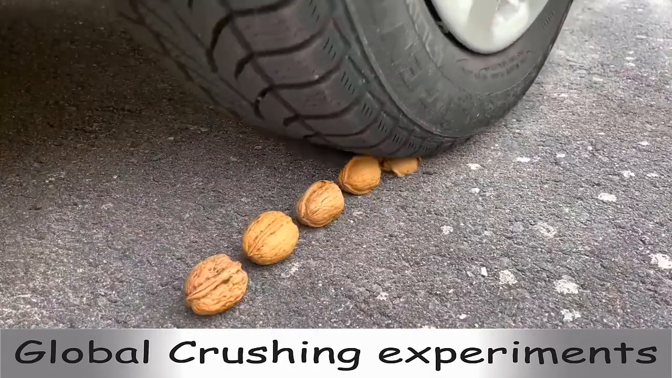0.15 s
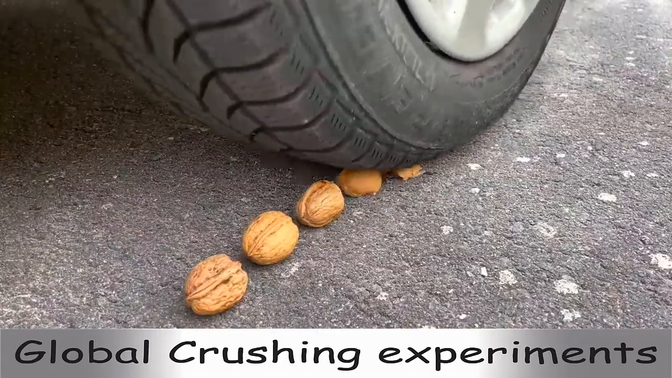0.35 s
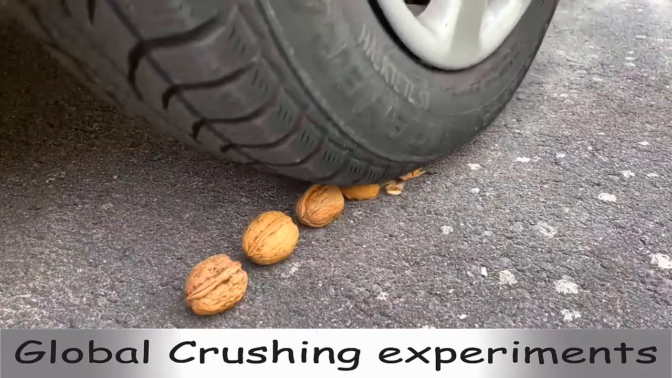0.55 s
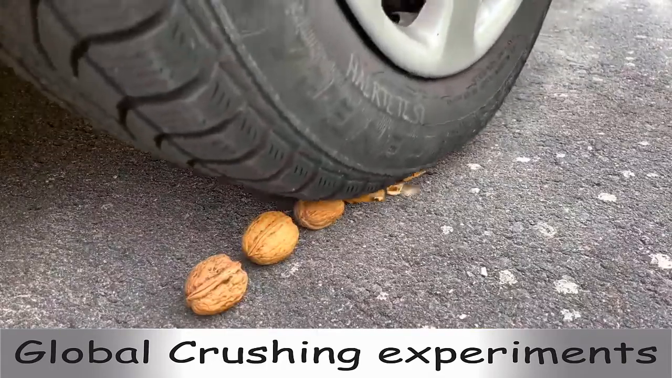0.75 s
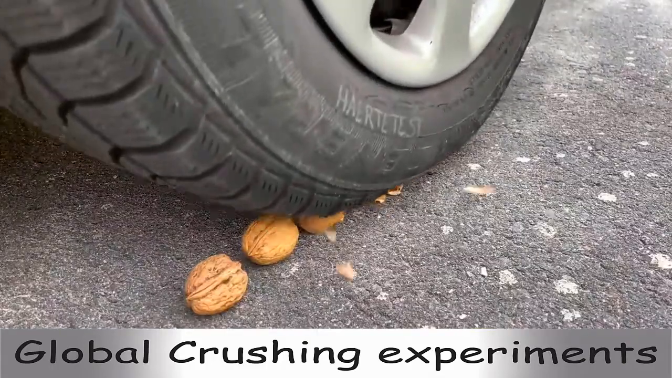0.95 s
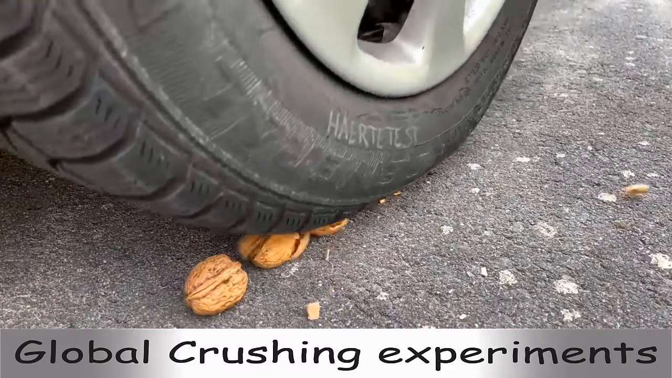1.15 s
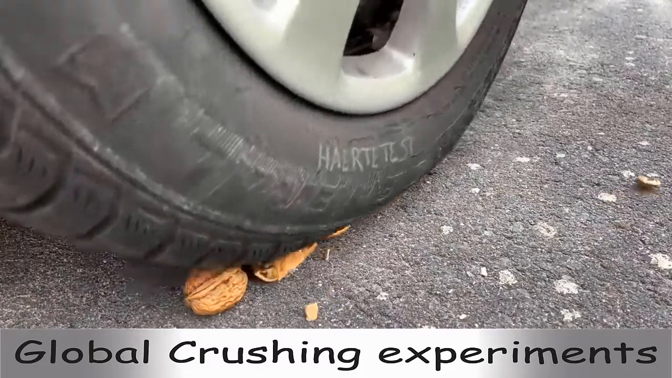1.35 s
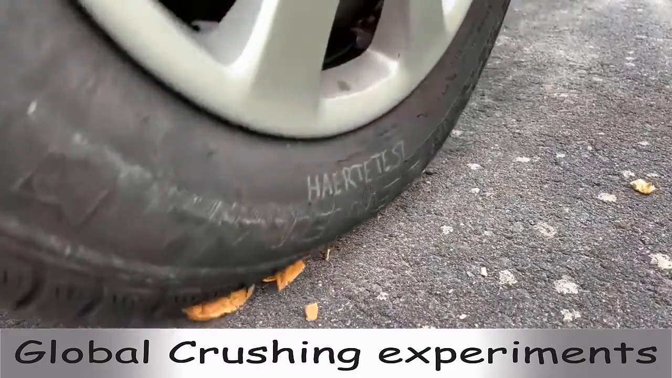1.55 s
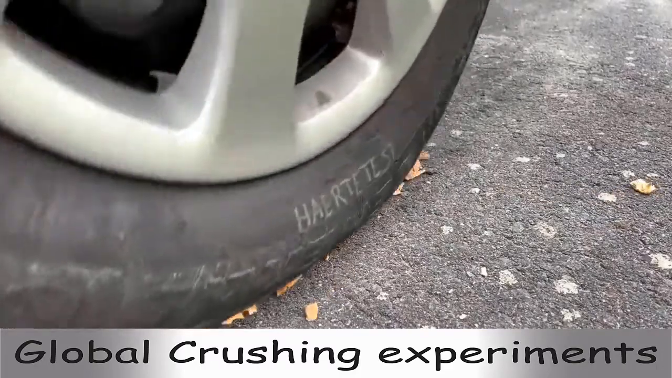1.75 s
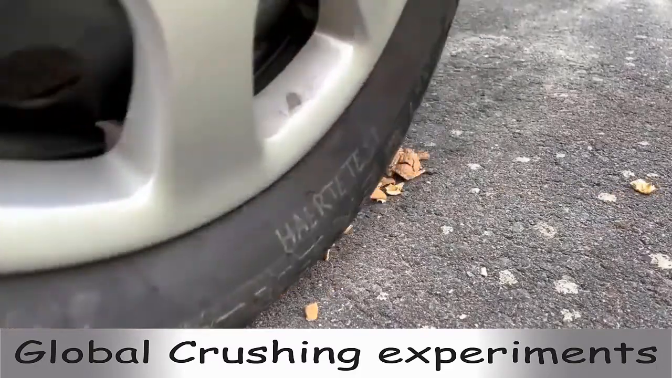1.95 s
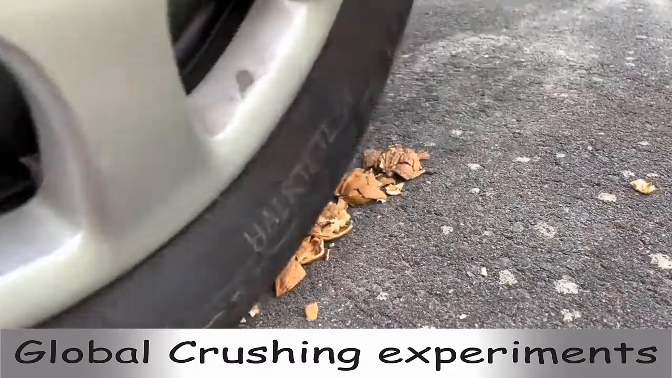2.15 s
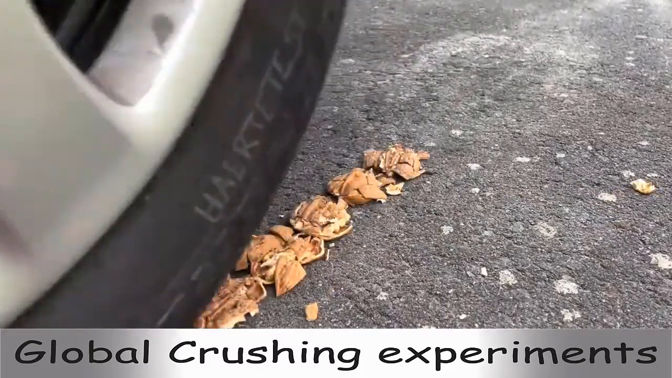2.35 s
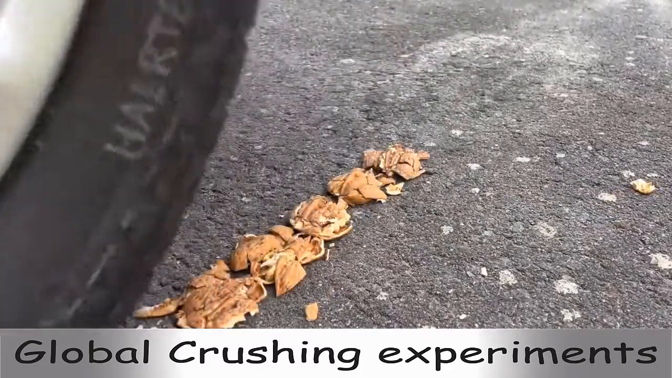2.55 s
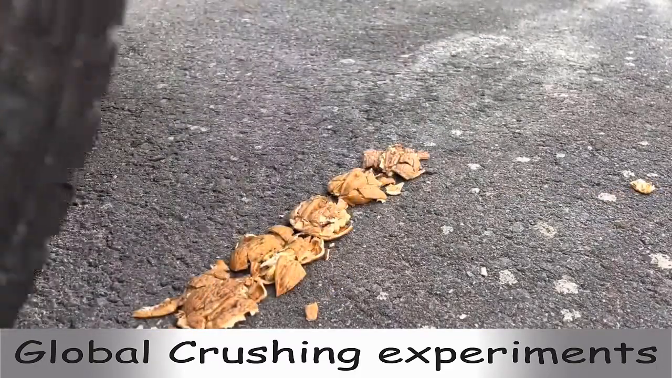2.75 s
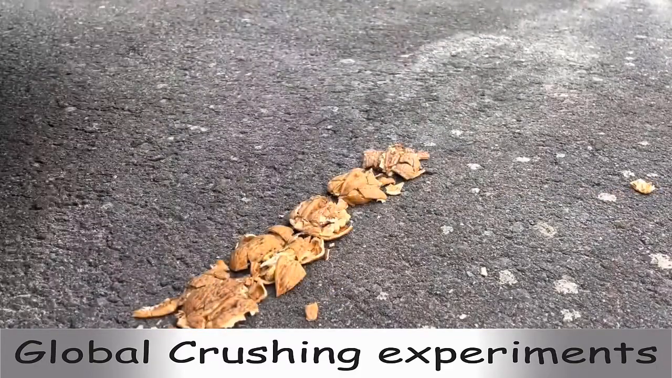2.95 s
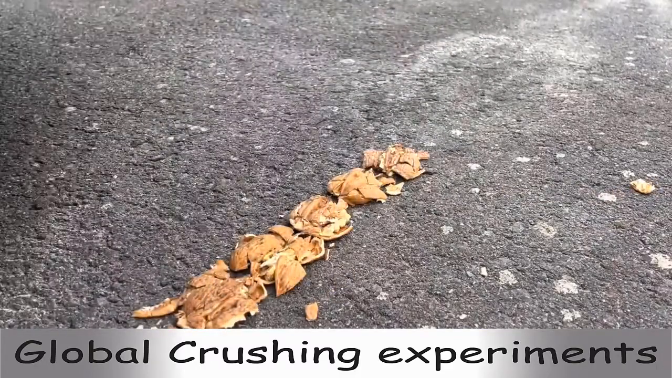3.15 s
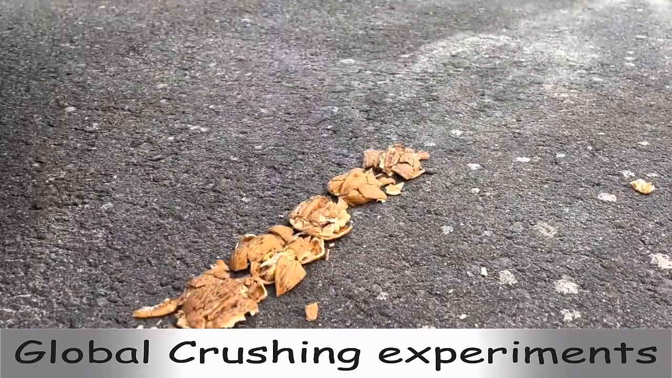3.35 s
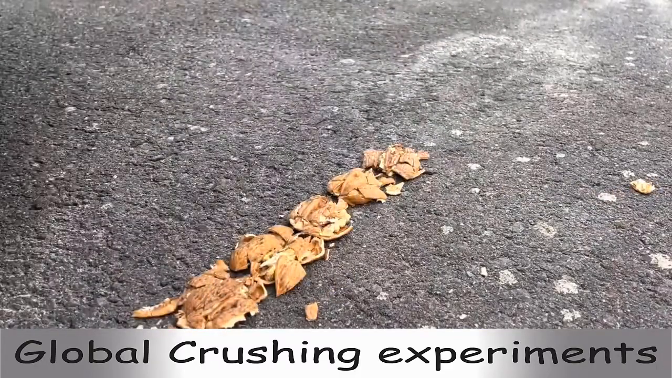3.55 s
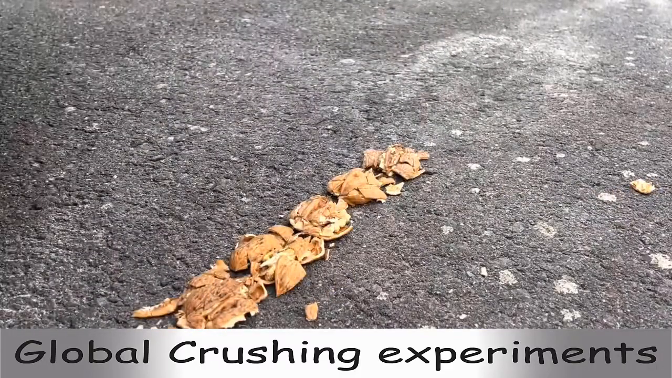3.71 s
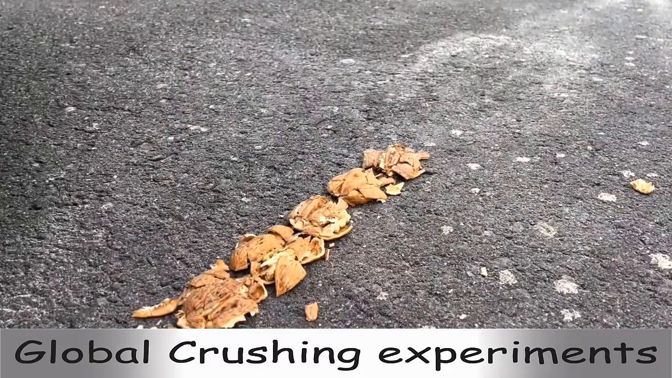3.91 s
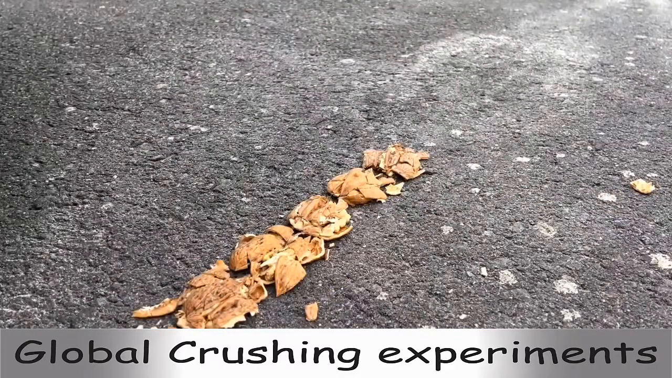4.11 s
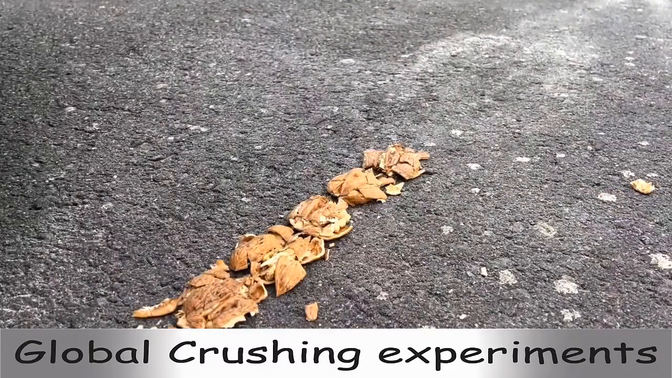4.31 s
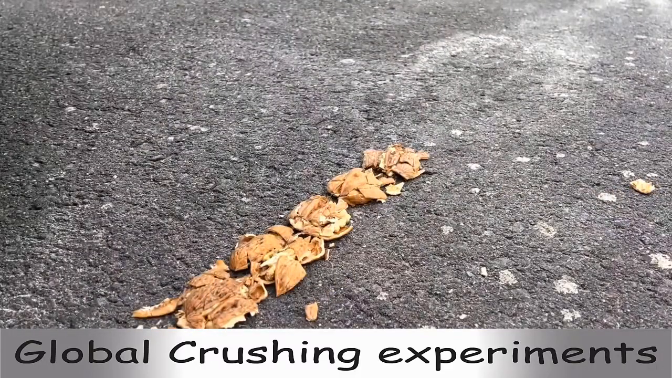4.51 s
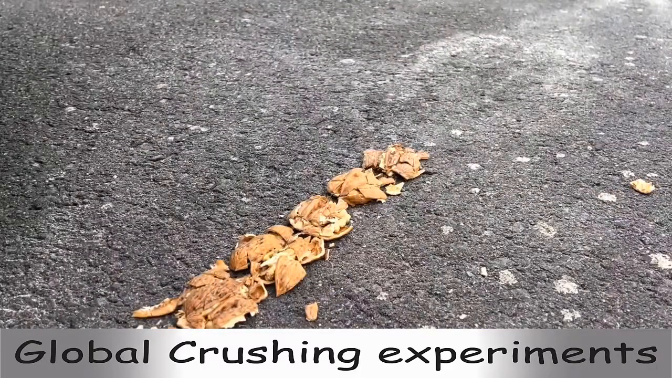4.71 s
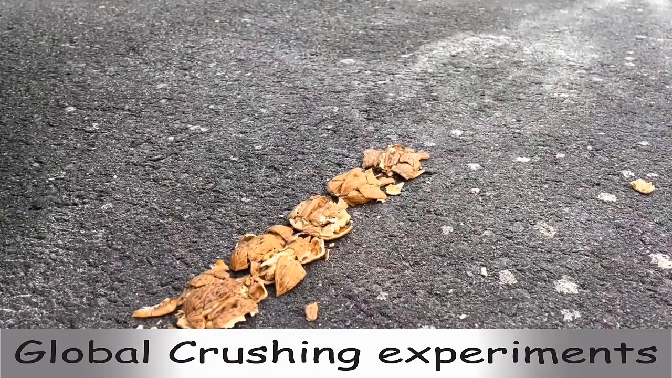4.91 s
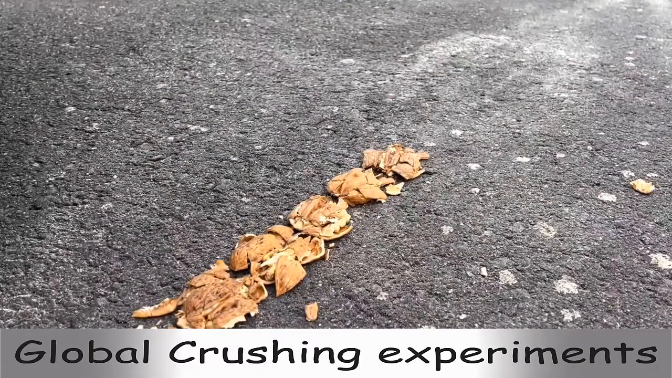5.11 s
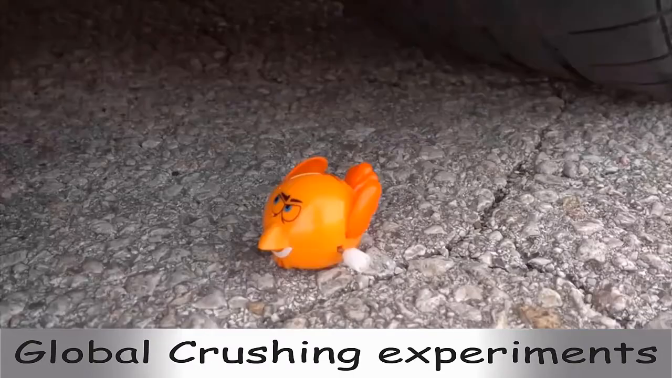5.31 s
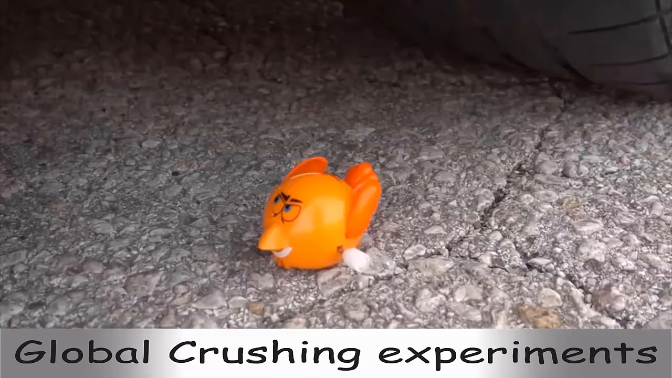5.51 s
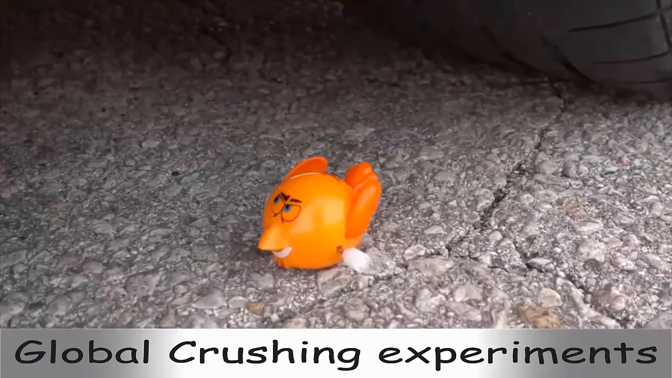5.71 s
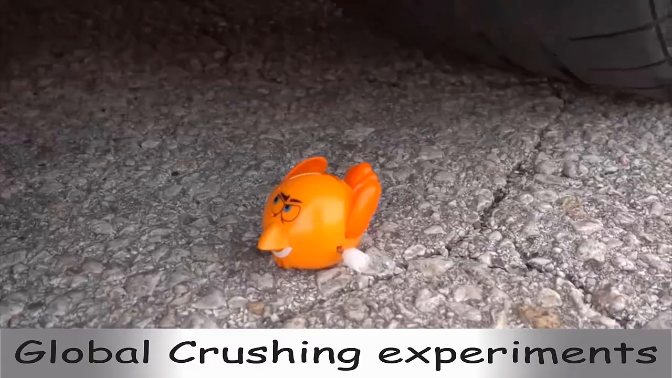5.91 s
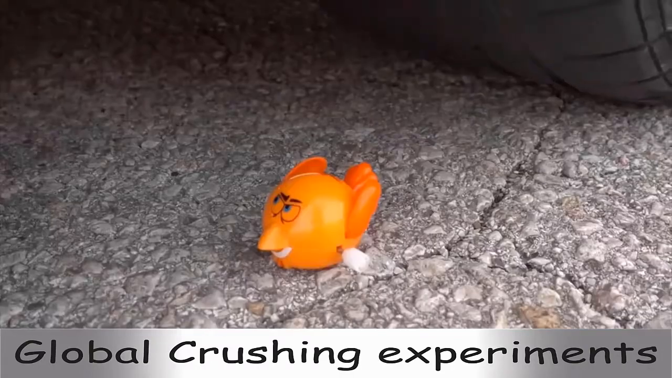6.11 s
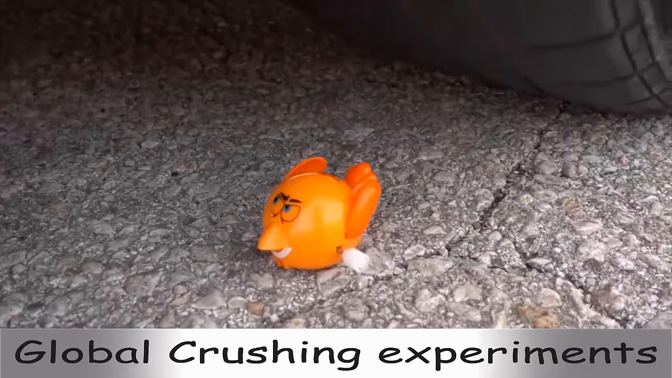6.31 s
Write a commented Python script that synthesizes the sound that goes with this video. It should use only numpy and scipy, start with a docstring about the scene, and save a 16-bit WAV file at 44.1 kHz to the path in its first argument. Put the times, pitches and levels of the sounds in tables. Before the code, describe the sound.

A car rolls slowly over a row of walnuts on asphalt, close to the microphone. The shells break in quick volleys of sharp cracks and crunches, with hollow knocks and dull thuds from the tyre. The cracking ends and the engine idles on with a low throb and a faint squeak as the car stops. Then the sound changes abruptly to gusty wind rumbling on the microphone outdoors.

```python
"""Walnuts under a tyre, then wind

An idling car rolls slowly over walnuts on asphalt, close to a stereo microphone. Each shell fails in
a volley of brittle fractures that ring between tyre and road, and the tyre drops with a thud. The car
rolls on and stops, its firings driving the resonances of the exhaust. After a short hiss the scene
changes to another spot outdoors, where turbulent wind buffets the microphone."""
import sys
import numpy as np
from scipy import signal
from scipy.fft import rfft, irfft
from scipy.io import wavfile

SR = 44100
rng = np.random.default_rng(int(sys.argv[2]) if len(sys.argv) > 2 else 0)


def wav_record(signal):
    """Record a signal, one row per channel, as 16-bit PCM in the file named by sys.argv[1]."""
    frames = np.transpose(np.atleast_2d(signal))
    bounded = np.clip(frames, -1, 1)
    # unit amplitude maps onto the largest positive 16-bit level
    quanta = np.round(bounded * 32767).astype(np.int16)
    wavfile.write(sys.argv[1], SR, quanta)


N = 284974
T = np.arange(N) / SR
SHELLS_END_S, STOP_S = 1.82, 3.6  # the tread leaves the last nut; the car stands
# Shell fractures, with levels as energies of a 1 ms burst: (time [s], snap level [dB], length [s],
# sizzle re snap [dB], shell pitch [Hz], ring level [dB], knock pitch [Hz], knock level [dB])
FRACTURES = [(0.0455, -21, 0.0036, -2.5, 2600, -23.5, 1076, -29.5),
             (0.0522, -13, 0.00079, -5, 2525, -30.5, 1084, -22.5),
             (0.0626, -17.5, 0.0024, -2.5, 1760, -20.5, 863, -15.5),
             (0.0811, -17, 0.001, -4.5, 1530, -32.5, 1147, -15.5),
             (0.0878, -19.5, 0.0027, 1, 1605, -28, 797, -19.5),
             (0.0922, -21, 0.005, -3, 2740, -37, 736, -17), (0.1234, -18, 0.00033, -1, 2564, -22, 940, -31),
             (0.1642, -26, 0.00043, 4.5, 1558, -32, 980, -27.5),
             (0.185, -28.5, 0.002, -0.5, 2600, -27, 924.5, -33),
             (0.2212, -18.5, 0.0029, 3.5, 1987, -15, 930, -12.5),
             (0.236, -21, 0.002, 1, 1720, -18.5, 1180, -26.5),
             (0.293, -29, 0.00035, 5, 2540, -22, 1020, -20),
             (0.297, -22.5, 0.0007, -5.5, 2250, -28, 917, -23),
             (0.3464, -21.5, 0.00087, -10, 1537, -28, 1151, -23.5),
             (0.3599, -23, 0.00068, -1, 2500, -26, 960, -22.5),
             (0.4008, -17.5, 0.00069, -2.5, 1860, -28, 1000, -22.5),
             (0.423, -24, 0.001, -8, 2200, -29.5, 1020, -29),
             (0.484, -23, 0.00088, -4, 2244, -33, 1098, -26.5),
             (0.553, -16, 0.00092, 1.5, 2545, -22.5, 968, -11.5),
             (0.6161, -15.0, 0.0026, 0.5, 2023, -15, 763.2, -14.5),
             (0.6233, -19.5, 0.0043, -5, 2880, -23.5, 918, -20),
             (0.6292, -15.5, 0.0043, -11, 2597, -23, 1006, -10.5),
             (0.6472, -21, 0.00092, 0.5, 2150, -16.5, 788.5, -21),
             (0.651, -17, 0.00069, -2, 2176, -15, 880, -20),
             (0.6619, -22, 0.00456, 0, 2485, -27.5, 837.2, -34),
             (0.6739, -18.5, 0.0012, -3, 2593, -15.5, 666.7, -24),
             (0.7047, -19.5, 0.0021, 3, 2190, -25, 1005, -41),
             (0.7759, -18, 0.00069, 2, 1700, -31, 917, -15.5),
             (0.7807, -16.5, 0.0023, 1.5, 2916, -28, 854, -12), (0.8, -30, 0.001, 7, 2065, -27.5, 950, -27),
             (0.8286, -38.5, 0.00075, 7.5, 2360, -35.5, 874, -28.5),
             (0.8733, -23, 0.00031, -2, 2088, -34, 1044, -19),
             (0.9995, -17.5, 0.0008, -3, 2928, -38.5, 995, -17.5),
             (1.0391, -24.5, 0.00082, 9.5, 1850, -26.5, 1067, -24.5),
             (1.0418, -14.5, 0.0027, 4, 1850, -10.5, 894, -16),
             (1.0778, -19.5, 0.00185, 1.5, 2010, -34, 790.5, -19),
             (1.2122, -14, 0.00058, -11, 1960, -28.5, 1054, -8),
             (1.3194, -41, 0.0014, 1, 1816, -39, 930, -23.5),
             (1.3852, -15, 0.0026, 1.5, 2130, -14.5, 819, -13.5),
             (1.4206, -24, 0.0025, -2, 2170, -46, 788, -32),
             (1.4488, -28, 0.0014, -1, 2000, -40.5, 1020, -26),
             (1.521, -19, 0.0016, -5, 2530, -40, 865, -15), (1.5671, -19, 0.0032, 1, 1580, -30.5, 933, -9),
             (1.5982, -27.5, 0.00062, -5, 1560, -31, 1140, -25.5),
             (1.6248, -21.0, 0.001, -11.5, 1780, -22, 1020, -11),
             (1.6348, -21, 0.0018, -0.5, 1493, -20.5, 905, -5.5),
             (1.682, -22.5, 0.00048, -1, 2447, -27.5, 1060, -21),
             (1.723, -26.5, 0.0039, -2, 2150, -31, 900, -18.5),
             (1.7374, -22.5, 0.0036, -0.5, 2080, -27, 810, -14),
             (1.778, -30.5, 0.00046, 4, 2370, -39, 920, -25), (1.802, -34, 0.00068, 5, 2150, -45, 935, -27),
             (1.8315, -30.5, 0.00082, 9.5, 2680, -40, 900, -27)]


def walnuts(snap_echo_db=-12.5, knock_echo_db=-16):
    """Superposition: the direct sound of the breaking nuts adds to its reflections under the car."""
    snap = snaps()
    blows = knocks() + thuds()
    return snap + blows + underbody(amp(snap_echo_db) * snap + amp(knock_echo_db) * blows)


def snaps(grain_db=3, fibres_db=-19, fibres_s=0.0024, shell_t60=0.0065):
    """Brittle fracture: a burst of tiny breaks snaps, sizzles and excites the modes of the shell."""
    # Spectra of the snap and of its splinters' sizzle: (frequency [Hz], relative level [dB])
    snap_spectrum = [(100, -23.5), (500, -6), (1500, -13), (2600, -4), (3600, -1), (5000, 0), (6500, -3),
                     (8500, -19.5), (16000, -32.5)]
    sizzle_spectrum = [(3000, -41), (7000, -12), (9500, 0), (12500, -6), (14500, -6.5), (16000, -14)]
    # Modes of the woody shell: (frequency [multiple of its pitch], level [dB])
    shell_modes = [(1.001, -0.5), (1.699, -6)]
    snap, shell = crumbs(), np.zeros((2, N))
    sizzle = snap.copy()  # the crumbs sizzle too
    breaks = noise_pair(shared=0.81) * unit(amp(grain_db * wander(5000)))
    t = T[:SR // 30]
    for start, db, length, sizzle_db, hz, ring_db, _, _ in FRACTURES:
        progress = t / length
        attack = np.minimum(1.2 * progress, 1)
        fibres = amp(fibres_db) ** 2 * np.exp(-t / (fibres_s + length))  # the last fibres tear
        envelope = attack * np.sqrt(np.exp(-progress ** 2) + fibres)
        burst = one_ms(breaks[:, round(start * SR):][:, :len(t)] * envelope)
        modes = sum(amp(level) * np.sin(2 * np.pi * hz * ratio * t) for ratio, level in shell_modes)
        ringing = convolve(burst, modes * amp(-60 * t / shell_t60))[:, :len(t)]
        add(snap, start, amp(db) * burst)
        add(sizzle, start, amp(db + sizzle_db) * burst)
        add(shell, start, amp(ring_db) * one_ms(ringing))
    lean_left = amp([[1.15], [-1.15]])
    return (colour(snap, snap_spectrum) + shell) * lean_left + colour(sizzle, sizzle_spectrum)


def knocks(sag=0.12, sag_s=0.0006, wedge_db=-5, wedge_rise_s=0.0023, detune=0.029):
    """Cavity resonance: the hollow shell's note sinks as it opens; air under the tyre rings on."""
    # Air modes of the tyre's grooves and the wedge beneath it: (frequency [Hz], level [dB], T60 [s])
    wedge_modes = [(370, -17.5, 0.039), (560, -14.5, 0.04), (784, -17, 0.039), (990, -18.5, 0.02),
                   (1123, -20.5, 0.016), (1893, -23.5, 0.018)]
    out, t = np.zeros(N), T[:SR // 10]
    tunings = 1 + detune * rng.standard_normal((len(FRACTURES), len(wedge_modes)))
    for (start, _, length, _, _, _, hz, db), tuning in zip(FRACTURES, tunings):
        turns = hz * (t - sag * sag_s * np.expm1(-t / sag_s))
        swell_s = 0.00079 + 0.078 * length
        hollow = one_ms(np.sin(2 * np.pi * turns) * t * np.exp(-t / swell_s))
        wedge = sum(np.sin(2 * np.pi * mode_hz * ratio * t) * amp(level - 60 * t / t60)
                    for (mode_hz, level, t60), ratio in zip(wedge_modes, tuning))
        wedge = one_ms(wedge * np.minimum(t / wedge_rise_s, 1))
        add(out, start + 0.25 * length, amp(db) * one_ms(hollow + amp(wedge_db) * wedge))
    return ports(out, balance_db=2)


def thuds(start_hz=544):
    """Impact: the tyre drops onto each collapsing nut and sends out a damped pressure swing."""
    # Drops of the tyre: (time [s], level [dB], decay time [s])
    drops = [(0.0649, -16.5, 0.0026), (0.224, -13, 0.007), (0.555, -23, 0.0021), (0.6191, -15.5, 0.0076),
             (0.654, -14.5, 0.0014), (.676, -15, 0.0179), (1.2154, -22.5, 0.002), (1.3898, -2, 0.012),
             (1.524, -27, 0.052), (1.637, -17, 0.0089)]
    pressure = kicks([(start, db, start_hz, decay) for start, db, decay in drops], glide_s=0.0025)
    return ports(pressure, lag_s=-0.000081, balance_db=2)


def crumbs(shed_db=-22, shed_fade_s=0.017, long_crack_s=0.0016, grind_db=-66, splinter_s=0.0011):
    """Fragmentation: longer cracks shed more crumbs; the tread grinds them and snaps splinters."""
    # Loose splinters breaking under the tread: (time [s], level [dB])
    splinter_snaps = [(0.001, -26.5), (0.0135, -29.5), (0.038, -23.5), (0.257, -30.5), (0.273, -32.5),
                      (0.2817, -25), (0.5055, -30), (0.524, -40), (0.541, -26.5), (0.7324, -21),
                      (0.9131, -39.5), (0.9745, -38), (1.2623, -36), (1.381, -34.5), (1.435, -27),
                      (1.537, -34), (1.838, -35.5), (1.9035, -32)]
    energy, splinters = np.zeros(N), np.zeros(N)
    for start, db, length, *_ in FRACTURES:
        energy[round((start + length) * SR)] = amp(db) ** 2 * length / long_crack_s
    for start, db in splinter_snaps:
        add(splinters, start, amp(db) * np.exp(-T[:SR // 50] / splinter_s))
        add(energy, start, amp([db]) ** 2)
    shed = np.sqrt(leak(energy, shed_fade_s / 2) + 1e-20)
    crunch = amp(shed_db) * shed * crackle(per_s=1300, spread_db=6, decay_s=0.00037)
    fine = crackle(per_s=4200, spread_db=6, decay_s=0.0008)
    coarse = crackle(per_s=29, spread_db=2.5, decay_s=0.00084)
    grinding = amp(grind_db) * (fine + coarse) * (1 - ramp(SHELLS_END_S, 0.082))
    return noise_pair(shared=0.97) * (crunch + splinters + grinding)


def underbody(x, t60=0.098, treble_t60=0.018, split_hz=3300):
    """Reverberation: dense reflections between road, tyre and car floor lose their treble first."""
    t = T[:SR // 4]
    echoes = rng.standard_normal((2, len(t))) * np.minimum(t / 0.0015, 1)
    low = band(echoes, 250, split_hz) * amp(-60 * t / t60)
    treble = band(echoes, split_hz, 14000) * amp(2.5 - 60 * t / treble_t60)
    tail = low + treble
    return convolve(x, tail / np.linalg.norm(tail[0]))


def wind(gust_s=5.495, gust_fade_s=0.049, eddy_hz=502, eddy_db_per_octave=12, overload_db=-11):
    """Turbulence: eddies strike the ports in turn, and the hardest saturate the microphone."""
    # Strength of the buffeting: (time [s], level [dB])
    strength = [(5.39, -34.5), (5.455, -35), (5.485, -20.5), (5.57, -18), (5.645, -27), (5.715, -26),
                (5.795, -41), (5.83, -30), (5.88, -28.5), (6.0, -23.5), (6.075, -30), (6.12, -18),
                (6.22, -20), (6.315, -20), (6.347, -43), (6.375, -26), (6.46, -21.5)]
    # Spectrum of the buffeting: (frequency [Hz], relative level [dB])
    buffet_spectrum = [(30, -16.5), (120, -2), (240, 0), (320, -8.5), (400, -14.5), (520, -23.5),
                       (700, -37), (1000, -41.5), (1500, -60), (3000, -96)]
    # Sharp eddies on the microphone: (time [s], level [dB])
    strikes = [(5.4164, -14), (5.435, -13.5), (5.463, -8), (5.481, -8.5), (5.489, -7.5), (5.501, -8.5),
               (5.535, -11.5), (5.574, -7.5), (5.672, -14.5), (5.704, -17), (5.826, -15.5), (6.033, -15),
               (6.109, -13.5), (6.135, -15), (6.253, -14.5), (6.287, -15.5)]
    force = amp(curve(strength))
    buffet = force * unit(colour(noise_pair(shared=0.84, lag_s=0.00054), buffet_spectrum))
    buffet *= unit(amp(3 * wander(90)))
    # the first, hardest gust breaks into smaller, higher eddies
    gust = force * np.exp(-abs(T - gust_s) / gust_fade_s)
    bite = gust * unit(band(noise_pair(shared=0.67, lag_s=0.0003), 260, 580))
    # a stronger eddy starts higher
    swings = [(start, db, eddy_hz * 2 ** ((db + 9) / eddy_db_per_octave), 0.0075)
              for start, db in strikes]
    eddies = ports(kicks(swings, glide_s=0.006), lag_s=0.0004)
    pressure = buffet + amp(-1) * (bite + eddies)
    saturated = amp(overload_db) * np.tanh(pressure / amp(overload_db))
    return band(saturated, 20, 1200, order=3)


def engine(rest_hz=26.41, rev_db_per_hz=1.9, approach_db_per_s=0.5, settle_db_per_s=2.5):
    """Forced resonance: four cylinders fire in turn into the exhaust, louder as they speed up."""
    # Engine speed: (time [s], firing rate [Hz])
    speed = [(0.0, 25.19), (0.6, 26.29), (1.2, 25.09), (1.85, 23.09), (2.15, 27.79), (2.42, 26.71),
             (2.7, 24.65), (2.95, 25.45), (3.35, 26.14), (4.3, 26.12), (5.33, 25.77)]
    # Strength of each cylinder: (level [dB])
    cylinders = [0.86, -0.65, -0.27, -0.34]
    # Exhaust and body resonances, from low to high: (frequency [Hz], bandwidth [Hz], level [dB])
    boom_modes = [(73.5, 30, -7.5), (142.15, 37.3, 0)]
    bark_modes = [(238.7, 19, 0.5), (288.5, 45, -0.5), (325, 48, -9.5), (383.73, 22, -4.5)]
    chuff_modes = [(368, 200, -5.5), (519, 38, 2.5)]
    rate = curve(speed)
    firing = np.floor(np.cumsum(rate) / SR + 0.72).astype(int)
    pulses = np.diff(firing, prepend=firing[0]) * amp(cylinders)[firing % len(cylinders)]

    def voice(modes, low_hz, high_hz, uneven_db, accent_db=0):
        """Impulse excitation: uneven firings ring one group of modes, at rms 1."""
        drive = pulses * amp(accent_db + uneven_db * rng.standard_normal(N))
        return unit(band(ring(drive, modes), low_hz, high_hz, order=4))

    boom = amp(-37) * voice(boom_modes, 41, 178, uneven_db=1.1)
    bark = amp(-52.5) * voice(bark_modes, 215, 480, uneven_db=2)
    chuff = amp(-60) * voice(chuff_modes, 280, 540, uneven_db=2, accent_db=-11 * (firing % 2))
    # the exhaust swells as the car nears and eases once it stands
    loss_db = np.maximum(approach_db_per_s * (STOP_S - T), settle_db_per_s * (T - STOP_S))
    gain = amp(rev_db_per_hz * (rate - rest_hz) - loss_db)
    # once past, the wheel no longer shields bark and chuff, and the exhaust is heard from the left
    passed = ramp(2.4, 0.79)
    exhaust = gain * (boom + (bark + chuff) * amp(5 * passed))
    return (1 - passed) * exhaust + passed * ports(exhaust, lag_s=-0.00038, balance_db=0.8)


def hiss(level_db=-42):
    """Filtered noise: a steady broadband hiss, strongest in the bass."""
    spectrum = [(60, 11.5), (3000, -6), (6000, -18), (15000, -14.5)]  # (frequency [Hz], level [dB])
    return amp(level_db) * colour(noise_pair(shared=0.45), spectrum)


def hum(hz=73.4, level_db=-50):
    """Beating: a low drifting tone, perhaps the cooling fan, interferes with the exhaust."""
    turns = np.cumsum(hz + wander(2.2)) / SR
    return amp(level_db) * unit(np.sin(2 * np.pi * turns))


def car_rush(bay_db=-63.5, tyre_db=-56, fade_db_per_s=12, flutter_db=1):
    """Incoherent sources add in power: the engine bay rushes on while the receding tyre fades."""
    # Spectrum of the rush: (frequency [Hz], relative level [dB])
    spectrum = [(30, -9.5), (150, -20), (300, -21.5), (600, -28.5), (900, -29.5), (1350, -40.5),
                (3000, -47.5), (4200, -51), (6000, -57), (11500, -60), (14000, -75)]
    rush = colour(noise_pair(shared=0.24, lag_s=-0.0003), spectrum)
    rush /= np.std(band(rush[0], 700, 3000))  # the levels refer to this band
    tyre = amp(tyre_db - fade_db_per_s * np.maximum(T - SHELLS_END_S, 0))
    return rush * np.hypot(amp(bay_db), tyre) * amp(flutter_db * wander(40))


def distant_sounds(rush_db=-63, moan_s=5.69, moan_width_s=0.0613, tick_s=6.4165):
    """Amplitude-modulated noise: behind the wind, a swelling rush, a brief moan and a dull tick."""
    # Spectrum of the distant rush: (frequency [Hz], relative level [dB])
    spectrum = [(350, -17.5), (650, -10.5), (1000, -12), (1500, -14.5), (2500, -28), (4500, -39.5),
                (10800, -42.5), (14000, -47.5)]
    # Its two swells: (time [s], level [dB], half width [s])
    surges = [(5.76, -61, 0.054), (6.422, -52.5, 0.063)]
    rush = colour(noise_pair(shared=0.39, lag_s=0.00003), spectrum)
    rush /= np.std(band(rush.mean(0), 1500, 6000))  # the levels refer to this band
    swells = sum(amp(db) * np.exp(-((T - peak) / width) ** 2 / 2) for peak, db, width in surges)
    moan = unit(band(noise_pair(shared=0.8), 610, 660)) * np.exp(-((T - moan_s) / moan_width_s) ** 2)
    out = rush * np.hypot(amp(rush_db), swells) + amp(-43) * moan
    t = T[:SR // 20]
    tick = unit(band(rng.standard_normal(len(t)), 680, 2080)) * np.exp(-t / 0.0051)
    add(out, tick_s, amp(-33) * tick)
    return out


def squeak(start_s=3.522, rise_s=0.0081):
    """Damped oscillation: three partials squeak faintly as the car stops."""
    # Partials of the squeak: (frequency [Hz], level [dB], T60 [s])
    partials = [(1437, -53.5, 0.0775), (2890, -57, 0.046), (4300, -62, 0.1)]
    out, t = np.zeros(N), T[:SR // 6]
    for hz, db, t60 in partials:
        envelope = np.minimum(t / rise_s, 1) * amp(db - 60 * np.maximum(t - rise_s, 0) / t60)
        add(out, start_s, envelope * np.sin(2 * np.pi * hz * t))
    return out


def wheel_arch(pass_s=2.21, width_s=0.18, scrub_db=-67, idle_db=-76):
    """Cavity resonance: the arch rings with the engine's rush, and more as the tread scrubs past."""
    # Modes of the hollow between arch and road: (frequency [Hz], bandwidth [Hz], level [dB])
    modes = [(1131, 110, 1), (1825, 220, -3), (2430, 220, -7)]
    ringing = np.array([ring(port, modes) for port in noise_pair(shared=0.32)])
    scrub = amp(scrub_db) * np.exp(-((T - pass_s) / width_s) ** 2)
    return unit(ringing) * (amp(idle_db) + scrub)


def grit(tick_db=-78, crunch_decay_s=0.008):
    """Contact noise: road grit ticks under the tread until the car stops; a few grains crunch."""
    # Single grains crushed: (time [s], level [dB])
    grains = [(2.728, -60), (2.845, -61.5), (2.94, -63), (3.107, -59)]
    ticks = unit(band(noise_pair(shared=0.92), 1100, 2600))
    ticks *= crackle(per_s=59, spread_db=-1.5, decay_s=0.004)
    bursts = np.zeros(N)
    for start, db in grains:
        add(bursts, start, amp(db) * np.exp(-T[:SR // 30] / crunch_decay_s))
    crunches = bursts * unit(band(noise_pair(shared=0.97), 1300, 3600))
    return amp(tick_db) * ticks * (1 - ramp(STOP_S - 0.2, 0.15)) + crunches


def whine(waver=0.0025, octave_db=-4.5, flicker_db=2.5):
    """Random modulation: a thin tone and its octave waver, and sag briefly as the engine slows."""
    # Course of the whine: (time [s], pitch [Hz], level [dB])
    course = [(2.35, 5930, -84.5), (2.68, 5770, -86), (2.9, 5899, -81), (4.1, 5860, -82), (4.6, 5900, -87),
              (4.85, 5898, -82)]
    turns = np.cumsum(curve(course) * (1 + waver * wander(170))) / SR
    tones = np.sin(2 * np.pi * turns) + amp(octave_db) * np.sin(4 * np.pi * turns)
    return unit(tones) * amp(curve(course, 2) + flicker_db * wander(26))


def kicks(rows, glide_s):
    """Damped chirps: pressure swings whose pitch has halved after glide_s."""
    out, t = np.zeros(N), T[:SR // 8]
    for start, db, hz, decay_s in rows:
        turns = hz * glide_s * np.log1p(t / glide_s)
        add(out, start, -amp(db) * np.sin(2 * np.pi * turns) * np.exp(-t / decay_s))
    return out


def ring(drive, modes):
    """Modal response: the drive excites resonances that swell and die."""
    t = T[:SR // 4]
    taps = sum(amp(db) * width ** 2 * t * np.exp(-np.pi * width * t) * np.cos(2 * np.pi * hz * t)
               for hz, width, db in modes)
    return convolve(drive, taps)[0]


def crackle(per_s, spread_db, decay_s):
    """Poisson process: the envelope of tiny breaks of uneven size, at rms 1."""
    sizes = amp(spread_db * np.minimum(rng.exponential(1, N), 4))
    occurs = rng.random(N) < per_s / SR
    return unit(leak(sizes * occurs, decay_s))


def ports(x, lag_s=0, balance_db=0):
    """Time and level difference: the left microphone port hears x lag_s later, balance_db louder."""
    delay = np.exp(-2j * np.pi * np.fft.rfftfreq(2 * N, 1 / SR) * lag_s)
    left = irfft(rfft(x, 2 * N) * delay)[:N]
    return np.array([left * amp(balance_db / 2), x * amp(-balance_db / 2)])


def noise_pair(shared, lag_s=0):
    """Partial coherence: white noise with a fraction of its power common to both ports."""
    common = ports(rng.standard_normal(N), lag_s)
    return np.sqrt(shared) * common + np.sqrt(1 - shared) * rng.standard_normal((2, N))


def wander(rate_hz):
    """Interpolated noise: a random drift of rms 1."""
    knots = np.arange(0, T[-1] + 1, 1 / rate_hz)
    return unit(np.interp(T, knots, rng.standard_normal(len(knots))))


def colour(x, spectrum, size=4096):
    """Minimum-phase filter of unit energy with the given spectrum."""
    db = at_frequency(spectrum, abs(np.fft.fftfreq(size, 1 / SR)))
    log_gain = np.log(amp(np.maximum(db, -100)))
    taps = np.fft.ifft(np.exp(np.conj(signal.hilbert(log_gain)))).real[:size // 2]
    return convolve(x, taps / np.linalg.norm(taps))


def band(x, low_hz, high_hz, order=2):
    """Band-pass filter."""
    return signal.sosfilt(signal.butter(order, [low_hz, high_hz], "band", fs=SR, output="sos"), x)


def leak(x, decay_s):
    """Leaky integration: each impulse decays exponentially."""
    return signal.lfilter([1], [1, -np.exp(-1 / (decay_s * SR))], x)


def convolve(x, taps):
    """Causal convolution, channel by channel."""
    return signal.oaconvolve(np.atleast_2d(x), np.atleast_2d(taps), axes=1)[:, :N]


def add(mix, start_s, sound):
    """Superposition of a sound on the mix from start_s."""
    part = mix[..., round(start_s * SR):][..., :sound.shape[-1]]
    part += sound[..., :part.shape[-1]]


def curve(rows, column=1):
    """Linear interpolation of a timed table at every sample."""
    rows = np.array(rows)
    return np.interp(T, rows[:, 0], rows[:, column])


def at_frequency(points, hz):
    """Interpolation on a log-frequency axis."""
    known_hz, values = np.transpose(points)
    return np.interp(np.log(hz + 1), np.log(known_hz + 1), values)


def ramp(start_s, length_s):
    """Linear rise from 0 to 1."""
    return np.clip((T - start_s) / length_s, 0, 1)


def amp(db):
    """Decibels to amplitude ratio."""
    return 10 ** (np.asarray(db) / 20)


def unit(x):
    """Normalisation to rms 1."""
    return x / np.sqrt(np.mean(x ** 2) + 1e-20)


def one_ms(x):
    """Normalisation to the energy of a 1 ms burst of rms 1."""
    return unit(x) * np.sqrt(0.001 * SR / x.shape[-1])


def scene(car_end_s=5.34, hiss_end_s=5.397, wind_rise_s=0.022):
    """Superposition in sequence: the car on the walnuts, the hiss, then the wind."""
    car = walnuts() + wheel_arch() + grit() + engine() + hum() + whine() + squeak() + car_rush()
    windy = (wind() + distant_sounds()) * ramp(hiss_end_s - wind_rise_s, wind_rise_s)
    between = (T >= car_end_s) & (T < hiss_end_s)
    return car * (T < car_end_s) + hiss() * between + windy


def record(dry, ceiling=0.9, edge_hz=16300):
    """Transduction: the ports differ in treble phase, peaks saturate, and the band is limited."""
    # Unequal resonance of the ports: (frequency [Hz], phase lead of the left [rad])
    port_phase = [(1500, 0), (3000, 0.5), (5600, 1.04), (6800, 0), (7800, -2.5), (9500, -5), (12500, -6),
                  (16000, -2)]
    lead = at_frequency(port_phase, np.fft.rfftfreq(2 * N, 1 / SR))
    left = irfft(rfft(dry[0], 2 * N) * np.exp(1j * lead))[:N]
    heard = np.array([left, dry[1]])
    rounded = heard / (1 + (heard / ceiling) ** 8) ** (1 / 8)
    low_pass = signal.firwin(511, edge_hz, window=("kaiser", 9), fs=SR)
    return signal.oaconvolve(rounded, low_pass[None], "same")


dry = scene()
out = record(dry)
wav_record(out)
```